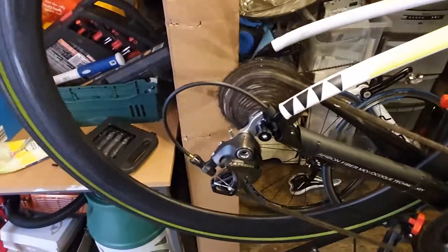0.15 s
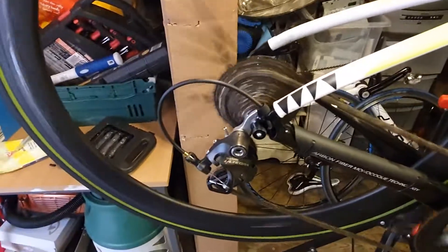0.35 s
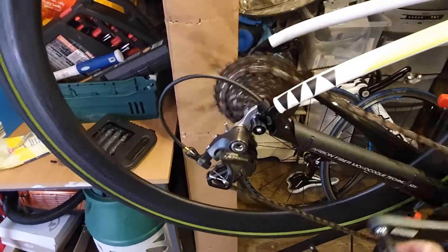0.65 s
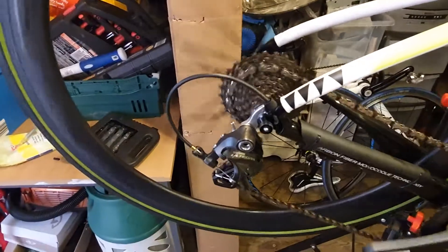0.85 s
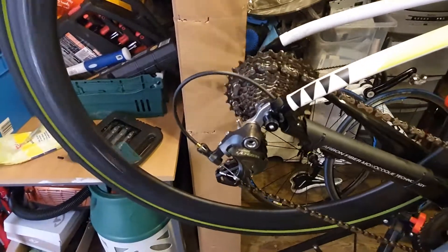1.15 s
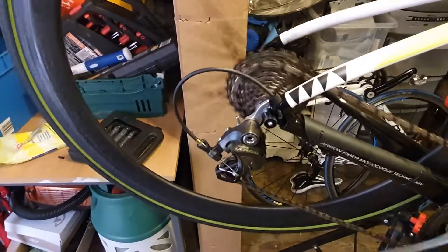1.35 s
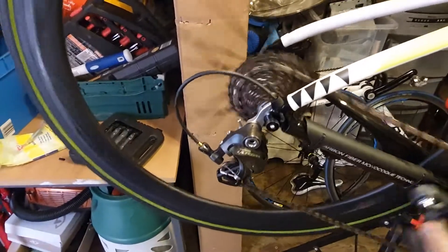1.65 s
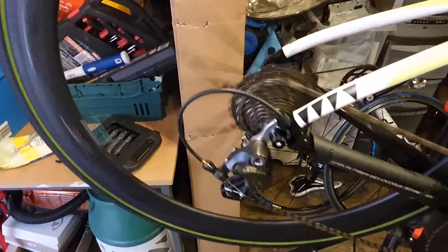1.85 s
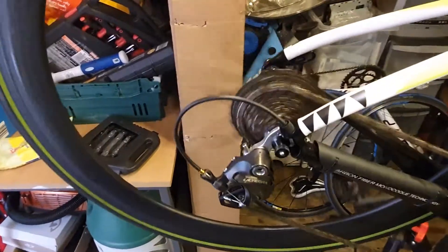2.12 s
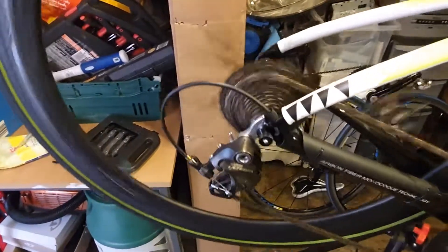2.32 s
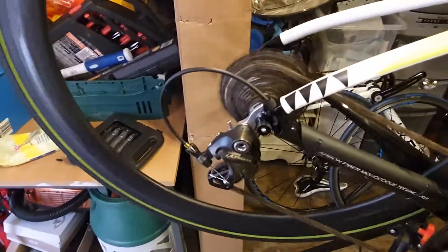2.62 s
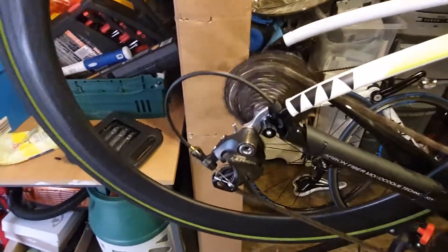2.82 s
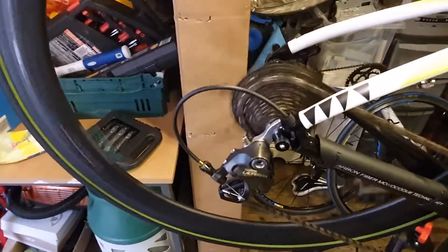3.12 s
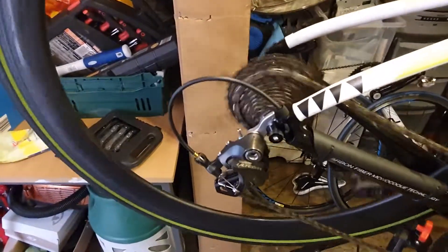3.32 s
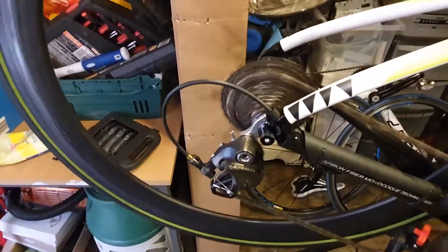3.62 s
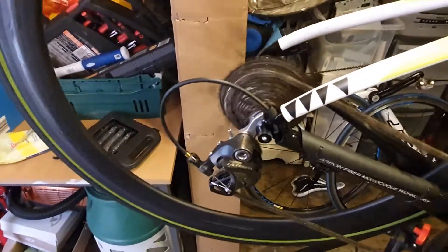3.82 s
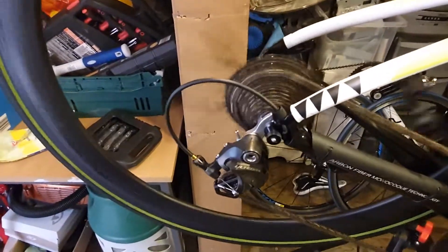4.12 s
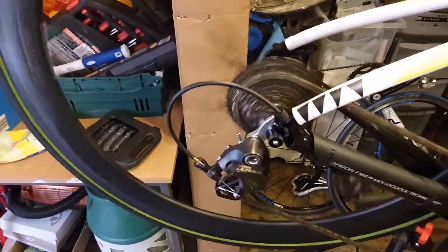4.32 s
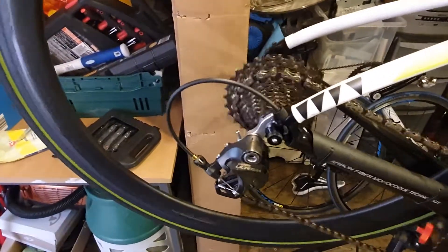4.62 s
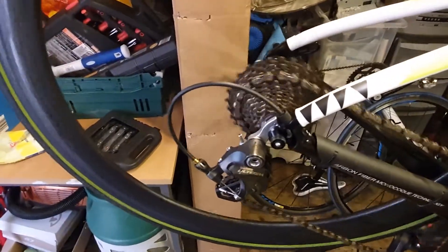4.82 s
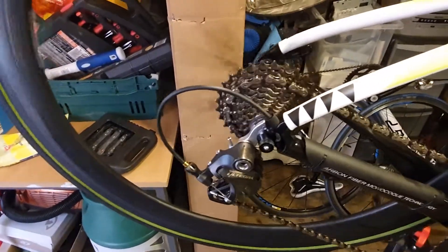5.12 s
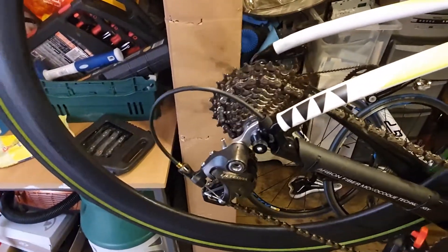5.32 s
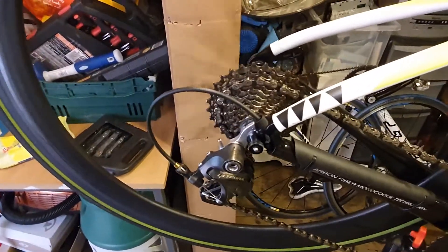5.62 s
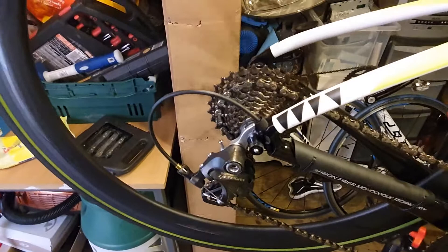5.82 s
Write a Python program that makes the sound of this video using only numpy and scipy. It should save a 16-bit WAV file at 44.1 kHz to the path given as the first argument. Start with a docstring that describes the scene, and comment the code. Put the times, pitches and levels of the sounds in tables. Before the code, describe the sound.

The freehub of a spinning bicycle wheel buzzes sharply, slackens to separate clicks and stops. Pedalling follows: dull frame thud, quickening chain rattle, irregular derailleur knocks and bright metal ticks. Then the ratchet whirs up suddenly, higher and denser with chain rattle from back-pedalling, slows to a coarser buzz and holds even. Close microphones, stereo, small indoor workshop with faint dark room tone.

```python
"""In a garage, a bicycle wheel spins on a stand and its freehub buzzes: pawls snap over the ratchet as fast as
wheel and cassette slip past each other, each blow ringing noise bursts and wheel modes. In between the cranks
drive the wheel: the buzz slows to single clicks and stops, the hub engages with a thud of frame modes, and the
chain ticks, hisses and clanks as shaped noise over a drive rumble. The buzz then returns. Room tone lies below."""
import sys
import numpy as np
from scipy import signal
from scipy.fft import rfft, irfft, next_fast_len
from scipy.io import wavfile
from scipy.ndimage import uniform_filter1d

SR = 44100
rng = np.random.default_rng(int(sys.argv[2]) if len(sys.argv) > 2 else 0)


def store_pcm(level_fs):
    """Save levels as 16-bit WAV."""
    pcm = np.round(np.clip(level_fs, -1, 1) * 32767).astype(np.int16)
    wavfile.write(sys.argv[1], SR, np.atleast_2d(pcm).T)


N = 262836
PAD = next_fast_len(N + SR)   # FFT length, with silence after the scene
HZ = np.maximum(np.arange(PAD // 2 + 1) * SR / PAD, 1)
T = np.arange(N) / SR

# Freewheeling before and after the pedalling: [t/s, slip/teeth per s]
SLIP_BEFORE = [(0.0, 177), (0.1, 184), (0.21, 208), (0.33, 207), (0.51, 165), (0.62, 154), (0.73, 114),
               (0.84, 101.6), (0.95, 117), (1.05, 109), (1.12, 91.3), (1.2, 59.1), (1.24, 47)]
SLIP_AFTER = [(3.14, 36), (3.34, 211), (3.45, 267), (3.54, 265), (3.62, 256), (3.75, 253), (3.87, 233),
              (4.01, 228.5), (4.33, 233.5), (4.43, 231.5), (4.52, 203), (4.66, 118), (4.77, 86),
              (4.86, 75.5), (4.97, 85), (5.19, 118.5), (5.34, 119.5), (5.96, 117)]
# Bright colour of a metal tick, from links and knocks alike: [f/Hz, relative level/dB]
TICK_COLOUR = [(3500, -9), (6000, 1), (10500, 5), (12500, 0), (16000, -8)]

WHEEL_TURNS_PER_S = 2.6
WHEEL_TEETH_PER_S = 118   # slip with the cassette at rest; faster slip means back-pedalling


def from_db(db):
    """Decibels to an amplitude factor."""
    return 10 ** (np.asarray(db) / 20)


def rms_one(x):
    """Scale a sound to an rms of 1."""
    return x / np.sqrt(np.mean(x ** 2) + 1e-20)


def at_hz(points, hz):
    """Read a curve at the given frequencies, straight between points on a log frequency axis."""
    points = np.array(points)
    return np.interp(np.log(hz), np.log(points[:, 0]), points[:, 1])


def colour(x, spectrum):
    """Filter a sound through a spectrum drawn in dB."""
    return irfft(rfft(x, PAD) * from_db(at_hz(spectrum, HZ)), PAD)[..., :N]


def rate_during(rows):
    """A rate drawn over time, sample by sample; zero outside its run."""
    start, end = rows[0][0], rows[-1][0]
    rate = np.interp(T, *np.transpose(rows))
    return rate * (T >= start) * (T <= end)


def passes(rows, whole_at=0.):
    """Moments at which a count running at the given rate crosses a whole number, and the rate there."""
    rate = rate_during(rows)
    count = np.cumsum(rate) / SR
    count = count - np.interp(whole_at, T, count)
    at = np.flatnonzero(np.diff(np.floor(count)) > 0)
    return T[at], rate[at]


def strikes(times, sizes):
    """A train of single-sample blows."""
    at = np.clip(np.round(np.asarray(times) * SR).astype(int), 0, N - 1)
    return np.bincount(at, sizes, N) + 1e-18


def ring(times, sizes, modes, spread_db, turns_per_s=0):
    """Each blow rings every mode; on a turning body the lobes of each mode sweep past either microphone."""
    out, times = np.zeros((2, N)), np.asarray(times)
    for hz, db, t60 in modes:
        r = from_db(-60 / (t60 * SR))   # decay per sample
        w = 2 * np.pi * hz / SR
        facing = np.cos(2 * np.pi * turns_per_s * (times[:, None] / 2 + rng.random(2)))
        share = from_db(db + spread_db * rng.standard_normal((len(times), 2))) * facing
        for side in range(2):
            blows = strikes(times, sizes * share[:, side])
            out[side] += signal.lfilter([0, np.sin(w)], [1, -2 * r * np.cos(w), r * r], blows)
    return out


def dying_noise(snap_t60, tail_db):
    """Response of a body with countless modes: a short snap, then a tail with its own decay in each octave."""
    # Decay of rim and garage together: [f/Hz, t60/s]
    ring_t60 = [(500, 0.25), (1300, 0.11), (3500, 0.16), (9000, 0.11), (16000, 0.049)]
    t, out = T[:SR // 4], 0
    snap = from_db(-60 * t / snap_t60)
    for low in 350 * 2. ** np.arange(6):
        high = min(2 * low, .45 * SR)
        octave = signal.butter(2, [low, high], "band", fs=SR, output="sos")
        tail = from_db(tail_db - 60 * t / at_hz(ring_t60, np.sqrt(2) * low))
        out = out + (snap + tail) * signal.sosfilt(octave, rng.standard_normal((2, len(t))))
    return out / np.sqrt(np.sum(out ** 2) / 2)   # energy 1 per side on average


def stereo_noise(spectrum):
    """Steady coloured noise, alike left and right in the bass only; rms 1."""
    # How far left and right share one noise: [f/Hz, likeness/0 to 1]
    likeness = [(60, 0.88), (160, 1), (300, 0.85), (600, 0.78), (1000, 0.18), (16000, 0)]
    mid, side = rfft(rng.standard_normal((2, PAD)))
    alike = np.clip(at_hz(likeness, HZ), -1, 1)
    pair = np.sqrt(1 + alike) * mid + np.sqrt(1 - alike) * side * [[1], [-1]]
    return rms_one(irfft(pair * from_db(at_hz(spectrum, HZ)), PAD)[:, :N])


def burst(times, db, spectrum, snap_t60, t60, tail_db):
    """Countless modes struck at once: coloured noise that starts sharply and dies in two stages."""
    blows = strikes(times, from_db(db))
    snap = signal.lfilter([1], [1, -from_db(-60 / (snap_t60 * SR))], blows)
    tail = signal.lfilter([1], [1, -from_db(-60 / (t60 * SR))], blows)
    return (snap + from_db(tail_db) * tail) * stereo_noise(spectrum)


def slip():
    """Teeth per second passing the pawls in the two freewheeling runs; none in between."""
    return rate_during(SLIP_BEFORE) + rate_during(SLIP_AFTER)


def ratchet_clicks():
    """Moments and blow sizes of the teeth: single slow clicks and two runs; faster pawls land harder."""
    # Single clicks as the slip dies out and returns: [t/s, blow level/dB]
    slow_clicks = [(1.2524, -3.5), (1.2776, -2), (1.3105, -4.5), (1.357, -6), (1.4353, -6.5),
                   (3.0936, -4.5), (3.1244, 1)]
    # One moment in each run at which a tooth passes: [t/s before, t/s after]
    tooth_at = (1.2311, 3.1472)
    wheel_speed_db, db_per_octave = 1.32, 1.5   # blow at the wheel's own speed; rise per doubling of slip
    times, slow_db = np.transpose(slow_clicks)
    sizes = from_db(slow_db)
    for run, tooth_s in zip((SLIP_BEFORE, SLIP_AFTER), tooth_at):
        at, rate = passes(run, tooth_s)
        octaves = np.log2(rate / WHEEL_TEETH_PER_S)
        times = np.r_[times, at]
        sizes = np.r_[sizes, from_db(wheel_speed_db + db_per_octave * octaves)]
    return times, sizes


def freehub(pawls=3, paths=14, scatter_s=.001, uneven_db=2.5, lead_db=3.0, modes_db=-25.5):
    """At each tooth the pawls land one just after another; as the wheel turns, blows take other paths out."""
    # Colour of the pawl blows: [f/Hz, relative level/dB]
    hub_colour = [(880, -47), (1500, -23), (1790, -19), (2490, -15), (2720, -2.5), (3150, 0), (3480, -6),
                  (4240, -0.5), (5540, -14.5), (7030, -11.5), (7690, -15), (10200, -7), (11700, -10.5),
                  (13100, -6), (16000, -12)]
    # Ringing of the wheel: [f/Hz, level/dB, t60/s]
    wheel_modes = [(1042, -27, .14), (1170, -33, .08), (1272, -29, .12), (1450, -16, .008), (1608, -27, .1),
                   (1790, -23, .09), (2000, -25, .06), (2100, -12, .006), (2120, -22, .06),
                   (2320, -24, .06), (2800, -9, .07), (3000, -12, .06), (3200, -10, .06), (4190, -11, .07),
                   (4400, -15, .06)]
    times, sizes = ratchet_clicks()
    late, strength = rng.standard_normal((2, len(times), pawls))
    landing = times[:, None] + scatter_s * np.abs(late)
    force = sizes[:, None] * from_db(uneven_db * strength)
    path = rng.integers(0, paths, landing.shape)

    # the leading pawl keeps strict time and holds one path for a quarter turn, so the buzz has a pitch
    landing[:, 0] = times + .00002 * late[:, 0]
    path[:, 0] = (times * WHEEL_TURNS_PER_S * 4).astype(int) % paths
    force[:, 0] *= from_db(lead_db)

    snaps = 0
    for k in range(paths):
        blows = strikes(landing[path == k], force[path == k])
        response = dying_noise(snap_t60=0.0064, tail_db=-3.5)
        snaps = snaps + signal.fftconvolve(blows[None], response, axes=1)[:, :N]
    hub_gain = np.sqrt(np.mean(from_db(at_hz(hub_colour, HZ[HZ > 500])) ** 2) * pawls)

    modes = ring(landing[:, 0], sizes, wheel_modes, spread_db=1.5, turns_per_s=WHEEL_TURNS_PER_S)
    low_trim = signal.butter(6, 880, "high", fs=SR, output="sos")   # keep only the modes' ringing above 880 Hz
    modes = signal.sosfilt(low_trim, modes)
    return colour(snaps, hub_colour) / hub_gain + from_db(modes_db) * modes


def chain(hiss_db=1.0, tick_db=0.0):
    """Links seat on the sprocket in a loose rhythm over roller hiss; the frame rumbles with the drive."""
    # Pedalling forward: [t/s, chain speed/links per s]
    link_rate = [(1.45, 18), (1.8, 32.2), (2.45, 59), (2.95, 68), (3.1, 37)]
    # Colour of seating links and roller hiss: [f/Hz, relative level/dB]
    rattle_colour = [(350, -48), (600, -12), (1050, -5.5), (1370, -7.5), (1900, -9), (2760, -4),
                     (4400, -10), (5050, -10.5), (7310, -24), (13200, -81), (16000, -55)]
    # Colour of the frame rumble: [f/Hz, relative level/dB]
    rumble_colour = [(40, -14), (62, -12), (100, -2), (135, -13.5), (152, -0.5), (164, 4.5), (178, -4),
                     (243, -12), (318, -9), (371, -13), (440, -12), (468, -3), (520, -8.5), (620, -14),
                     (700, -15.5), (900, -8.5), (1200, -35)]
    rumble_db, rattle_db = -53, -58   # added by the drive at 50 links per s forward
    idle_rumble_db, idle_rattle_db = -61.5, -66.5   # always present, also with the cranks at rest
    slack_db = 7   # the slack chain rattles more running backward
    links_per_tooth = 0.62   # back-pedalling: links per tooth of extra slip
    load_power = 1.48   # pedalling forward, the noise grows faster than the speed

    at, rate = passes(link_rate)
    chance = rng.standard_normal((len(at), 2))
    at = at + .12 * chance[:, 0] / rate   # scatter as a share of the link interval
    seat_db = 4.0 * chance[:, 1]
    seats = burst(at, seat_db, rattle_colour, snap_t60=0.023, t60=0.14, tail_db=-11)
    ticks = burst(at, seat_db + tick_db, TICK_COLOUR, snap_t60=.014, t60=.08, tail_db=-11)
    rattle = seats + ticks + from_db(hiss_db) * stereo_noise(rattle_colour)

    # drive in both directions, 1 at 50 links per s
    forward = uniform_filter1d(rate_during(link_rate), SR // 20) / 50
    forward = np.abs(forward) ** load_power
    backward = links_per_tooth * np.maximum(slip() - WHEEL_TEETH_PER_S, 0) / 50
    rattle_gain = from_db(rattle_db) * (forward + from_db(slack_db) * backward) + from_db(idle_rattle_db)
    rumble_gain = from_db(rumble_db) * (forward + backward) + from_db(idle_rumble_db)
    return rattle_gain * rattle + rumble_gain * stereo_noise(rumble_colour)


def room_tone():
    """Steady, dark background noise of the garage."""
    # Colour of the background: [f/Hz, relative level/dB]
    room_colour = [(20, -42), (40, 7.5), (60, 9), (110, -3), (200, -4.5), (400, -6), (700, -15), (1100, -5),
                   (3000, -16), (5500, -38), (9000, -52), (16000, -60)]
    return from_db(-54) * stereo_noise(room_colour)


def knocks():
    """Chain and derailleur knocks ring the derailleur cage and the stays and give a bright tick."""
    # Every knock: [t/s, cage level/dB, stays level/dB, tick level/dB]
    knock_levels = [(1.419, -50, -47, -58), (1.5395, -55, -59, -45), (1.59, -38.5, -46, -56),
                    (1.8025, -61, -55, -68), (1.9, -43, -59, -58), (1.978, -61, -68, -44),
                    (1.999, -52, -50, -60), (2.0456, -45, -45.5, -45), (2.1979, -53, -63, -48),
                    (2.2784, -33, -41, -28), (2.387, -53, -74, -45), (2.4435, -50, -42, -46),
                    (2.4958, -49.5, -45, -43), (2.6324, -43, -45.5, -60), (2.7023, -48.5, -44, -58),
                    (2.742, -58, -70, -40), (2.848, -48, -43.5, -50), (2.88, -49.5, -48, -41),
                    (2.9421, -56, -66, -39), (3.0663, -30, -42.5, -28)]
    # Colour of the derailleur cage: [f/Hz, relative level/dB]
    cage_colour = [(1500, -13), (2300, -9), (2700, 5.5), (2870, 8.5), (3100, -3), (4000, -8), (5200, -10),
                   (7000, -21)]
    # Colour of the stays: [f/Hz, relative level/dB]
    stays_colour = [(600, -24), (800, -14), (890, 1.5), (970, 2), (1060, 13.5), (1180, -15), (1300, 0),
                    (1700, -22)]
    at, cage_db, stays_db, tick_db = np.transpose(knock_levels)
    cage = burst(at, cage_db, cage_colour, snap_t60=0.024, t60=0.21, tail_db=0)
    stays = burst(at, stays_db, stays_colour, snap_t60=0.06, t60=0.3, tail_db=-5.5)
    tick = burst(at, tick_db, TICK_COLOUR, snap_t60=0.0073, t60=0.069, tail_db=-24.5)
    return cage + stays + tick


def hub_thuds():
    """The hub takes the load and rebounds; each soft blow shakes the modes of the whole frame."""
    # Blows of the engaging hub: [t/s, level/dB]
    thud_levels = [(1.594, -29.5), (1.620, -36), (1.640, -31)]
    # Ringing of the frame: [f/Hz, level/dB, t60/s]
    frame_modes = [(67, -13, 0.41), (86.4, -8, 0.23), (162, -11.5, 0.11), (394, -16, 0.21),
                   (444, -18, 0.15), (467, -0.5, 0.14), (835, -7.5, 0.095)]
    at, db = np.transpose(thud_levels)
    thud = ring(at, from_db(db), frame_modes, spread_db=1.0)[0]   # the same on both sides
    soft_contact = signal.butter(2, 700, fs=SR, output="sos")   # a slow contact excites little treble
    return signal.sosfilt(soft_contact, thud)


def gain_control(x):
    """The gain drops quickly under loud sound and creeps back up in the quiet."""
    neutral_db, share = -23.5, 0.28   # level left alone; share of a level change taken back
    attack_s, fall_db_per_s = .15, 12   # smoothing time; fall of the held level in the quiet
    power = uniform_filter1d(np.mean(x ** 2, axis=0), SR // 20)
    ramp = fall_db_per_s * T
    held_db = np.maximum.accumulate(10 * np.log10(power + 1e-12) + ramp) - ramp
    r = np.exp(-1 / (attack_s * SR))
    smooth_db = signal.lfilter([1 - r], [1, -r], held_db - held_db[0]) + held_db[0]
    return x * from_db(share * (neutral_db - smooth_db))


def scene():
    """Mix the buzzing hub, chain, knocks, thuds and room tone."""
    return freehub() + chain() + room_tone() + knocks() + hub_thuds()


def record(dry):
    """The two microphones differ a little in colour; the gain follows the level; the top is cut."""
    # Colour difference of the microphones: [f/Hz, left minus right/dB]
    balance = [(60, -1), (180, -1.0), (550, -1.5), (1650, 3), (4970, -0.5), (15000, 3)]
    tilt = from_db(at_hz(balance, HZ) / 2 * np.array([[1], [-1]]))
    heard = irfft(rfft(dry, PAD) * tilt, PAD)[:, :N]
    top_cut = signal.cheby2(16, 60, 16250, fs=SR, output="sos")   # 60 dB down from 16250 Hz
    return signal.sosfilt(top_cut, gain_control(heard))


dry = scene()
out = record(dry)
store_pcm(out)
```